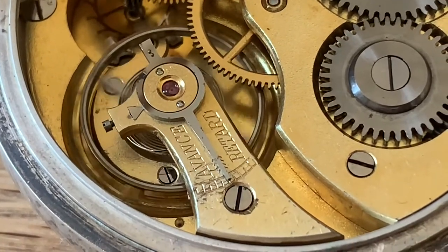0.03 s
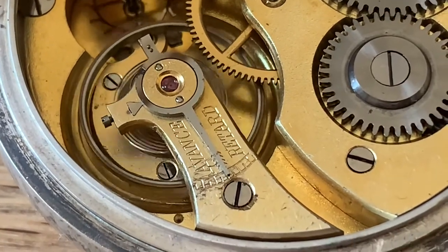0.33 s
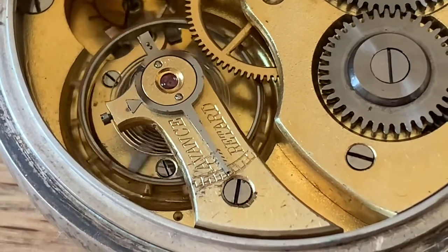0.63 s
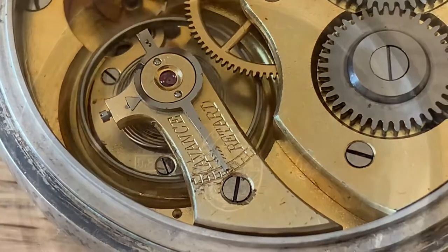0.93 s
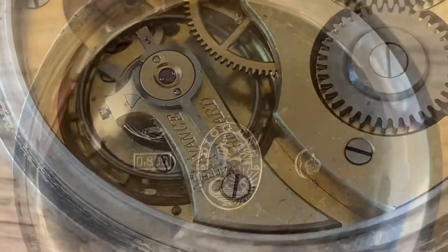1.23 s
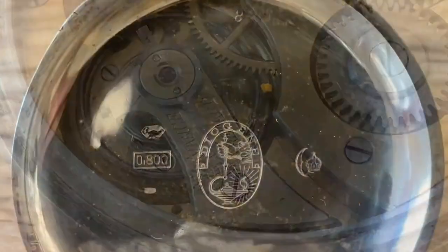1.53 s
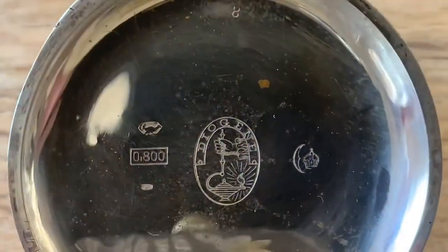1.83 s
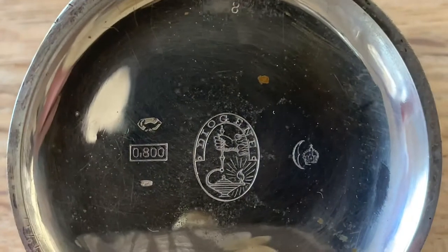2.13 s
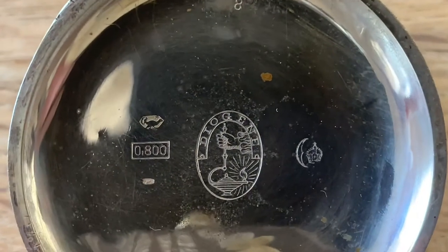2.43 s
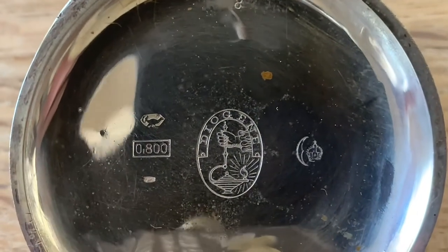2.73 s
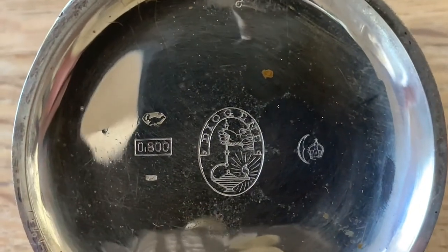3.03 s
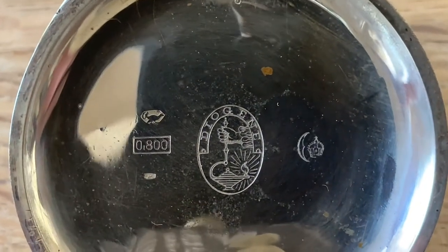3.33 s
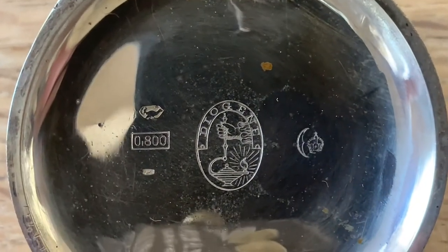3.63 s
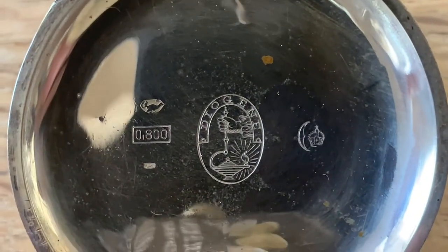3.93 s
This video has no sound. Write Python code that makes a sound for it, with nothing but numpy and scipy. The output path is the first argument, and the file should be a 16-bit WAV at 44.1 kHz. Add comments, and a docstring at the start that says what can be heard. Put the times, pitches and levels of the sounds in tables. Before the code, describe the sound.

Fast, crisp pocket watch ticking turns softer and drier, with a low rumble behind it.

```python
"""A quiet room, close to a pocket watch ticking five times a second. Each beat is three contacts
(unlocking, impulse, lock) that crack and ring the case. The bare movement dissolves into the same
watch with its inner lid shut, softer and drier. The room hums and rumbles; with the shut watch come
a low drone, like an engine far outside, and faint taps, hiss and rubbing."""
import sys
import numpy as np
from scipy.fft import rfft, irfft, next_fast_len
from scipy.io import wavfile
from scipy.ndimage import uniform_filter1d, map_coordinates

SR = 44100
rng = np.random.default_rng(int(sys.argv[2]) if len(sys.argv) > 2 else 0)


def inscribe(sig):
    """Save sig as 16-bit PCM at rate SR to the path in sys.argv[1].

    A 1-D sig is mono; a 2-D sig holds one channel per row.
    Samples are clipped to [-1, 1] before scaling.
    """
    pcm = np.round(np.clip(np.atleast_2d(sig).T, -1, 1) * 32767)
    wavfile.write(sys.argv[1], SR, pcm.astype(np.int16))


N = 176400


def amp(db):
    """Decibels to gain."""
    return 10 ** (np.asarray(db) / 20)


def unit(x):
    """Scale to rms 1."""
    return x / np.sqrt(np.mean(x ** 2) + 1e-20)


def along(points, hz):
    """Interpolate (Hz, value) points on a log axis."""
    point_hz, values = np.transpose(points)
    return np.interp(np.log(hz + 1), np.log(point_hz + 1), values)


def curve(rows):
    """Interpolate (s, value) points, one value per sample."""
    return np.interp(np.arange(N) / SR, *np.transpose(rows))


def wobble(rate_hz):
    """Smooth random curve, rate_hz knots a second."""
    knots = rng.standard_normal(int(N * rate_hz / SR) + 4)
    return map_coordinates(knots, [np.arange(N) * rate_hz / SR])


def swell(middle_s, length_s):
    """Flat-topped envelope with soft edges."""
    return np.exp(-(2 * (np.arange(N) / SR - middle_s) / length_s) ** 4)


def filtered(x, response):
    """Apply a complex frequency response."""
    size = next_fast_len(N + SR // 2)
    return irfft(rfft(x, size) * response(np.fft.rfftfreq(size, 1 / SR)), size)[..., :N]


def noise(spectrum):
    """Two independent coloured noises, rms 1."""
    return unit(filtered(rng.standard_normal((2, N)), lambda hz: amp(along(spectrum, hz))))


def narrow(hz, q):
    """Two independent noises in one resonance, rms 1."""
    white = rng.standard_normal((2, N))
    return unit(filtered(white, lambda f: 1 / (1 + (q * (f / hz - hz / (f + 1))) ** 2)))


def even(x, samples=100):
    """Level out chance swells in noise, so like blows are equally strong."""
    return x / np.sqrt(np.abs(uniform_filter1d(x ** 2, samples)) + 1e-20)


def add(track, start_s, sound):
    """Mix a sound into a track."""
    part = track[max(round(start_s * SR), 0):][:len(sound)]
    part += sound[:len(part)]


def room(spectrum, likeness, air_db, left_db, hum_db, waver_db, motor_hz=48.8):
    """Rumble and faint hiss, with the hum of a motor in the building."""
    width = lambda hz: np.arccos(np.clip(along(likeness, hz), -1, 1)) / 2
    mid, side = filtered(noise(spectrum), lambda hz: np.array([np.cos(width(hz)), np.sin(width(hz))]))
    level_db = air_db + 0.49 * wobble(6.83) + np.array([[.5], [-.5]]) * left_db
    air = unit(np.array([mid + side, mid - side])) * amp(level_db)
    hum = np.sqrt(2) * np.sin(2 * np.pi * (motor_hz * np.arange(N) / SR + rng.random()))
    return air + hum * amp(hum_db + waver_db * wobble(5))


def watch(contacts, modes, hollow_db, crack_colour, wash_colour, *, first_s, tock_lead_s, tock_db,
          contact_s, crack_db, crack_t60_s, slide_db, wash_db, wash_t60_s, echo_db, echo_t60_s):
    """Each contact cracks and rings the case; the pallet slides between them; the room answers."""
    # Each row: frequency in Hz, phase lead of left over right in radians.
    stereo_phase = [(2500, 0), (3800, -.6), (4800, -2.4), (6400, -.4), (7300, -1.6), (8100, -2.8),
                    (8750, -3.15), (10800, -6.2), (12000, -7.6), (16200, -13)]
    # Whisper before a beat and tail after it. Each row: frequency in Hz, relative density in dB.
    echo_colour = [(1900, -35), (2400, -12), (2750, 1), (3050, -1), (3300, -10), (3750, 1), (4500, -6),
                   (5400, -24), (9000, -32)]
    beat_s, swing_s, swing_db = .19828, .049, -8
    ring_db, linewidth_hz, t60_scatter, hollow_below_hz = 2.5, 20, .2, 5000
    ring, crack_power, wash_power, echo_power = np.zeros((4, N))
    t = np.arange(SR // 6) / SR
    rise = np.minimum(t / contact_s, 1)
    fall = lambda t60_s: amp(-60 * np.maximum(t - contact_s, 0) / t60_s)
    mode_hz, mode_db, mode_t60_s = np.transpose(modes)[:, :, None]
    for beat, boost_db in enumerate(hollow_db):
        tock = beat % 2
        lock_s = first_s + beat * beat_s - tock * tock_lead_s
        strength = amp(tock * tock_db + rng.normal(0, 0.18))
        # No beat rings quite like the last.
        walk = np.cumsum(rng.standard_normal((len(modes), len(t))), axis=1)
        phase = 2 * np.pi * mode_hz * t + walk * np.sqrt(2 * np.pi * linewidth_hz / SR)
        beat_t60_s = mode_t60_s * np.exp(t60_scatter * rng.standard_normal(mode_t60_s.shape))
        decay = amp(mode_db + boost_db * (mode_hz < hollow_below_hz) - 60 * t / beat_t60_s)
        partials = rise * decay * np.exp(1j * phase)
        for *ahead_s, contact_db in contacts:
            start_s = lock_s - ahead_s[tock]
            gain = strength * amp(contact_db)
            struck = amp(rng.normal(0, 1.5, len(modes))) * np.exp(2j * np.pi * rng.random(len(modes)))
            add(ring, start_s, gain * (struck[:, None] * partials).imag.sum(axis=0))
            add(crack_power, start_s, (gain * rise * fall(crack_t60_s)) ** 2)
            add(wash_power, start_s, (gain * rise * fall(wash_t60_s)) ** 2)
        add(echo_power, lock_s, (strength * rise * fall(echo_t60_s)) ** 2)
        # The balance whispers as it speeds towards the beat.
        whisper = np.linspace(0, strength * amp(swing_db), int(swing_s * SR))
        add(echo_power, lock_s - swing_s, whisper ** 2)
        slide_s = contacts[0][tock]
        slide = np.full(int(slide_s * SR), strength * amp(slide_db[tock]))
        add(crack_power, lock_s - slide_s, slide ** 2)
    crack = amp(crack_db) * np.sqrt(crack_power) * even(noise(crack_colour)[0])
    wash = amp(wash_db) * np.sqrt(wash_power) * noise(wash_colour)[0]
    spread = lambda hz: np.exp(.5j * np.outer([1, -1], along(stereo_phase, hz)))
    direct = filtered(amp(ring_db) * ring + crack + wash, spread)
    walls = noise(echo_colour)
    return direct + amp(echo_db) * np.sqrt(echo_power) * unit(walls + 0.24 * walls[::-1])


def bare_watch():
    """Exposed movement: sharp contacts, long tail."""
    # Each row: time ahead of the lock in seconds on the tick, the same on the tock, relative dB.
    contacts = [(.0100, .0090, -20), (.0055, .0054, -20), (0, 0, 0)]
    # Movement and case. Each row: frequency in Hz, relative level in dB, T60 in seconds.
    modes = [(2730, -69, .06), (3760, -64.5, .045), (4520, -71, .02), (6430, -67, .062), (7300, -64, .035),
             (7750, -63, .02), (8650, -58, .05), (10400, -50, .025), (11520, -56, .085), (11790, -59, .08),
             (12020, -61, .09), (13150, -58, .05), (13600, -45, .01), (14680, -55.5, .065),
             (15450, -65, .075)]
    # Each entry: one beat's boost of the low, hollow modes in dB.
    hollow_db = [-8, -0.5, -3.5, 3, -4, -0.5, -5, -4]
    # Steel-on-jewel crack; dense fine ringing. Each row: frequency in Hz, relative density in dB.
    crack_colour = [(2200, -71), (3600, -16.5), (5800, -26.5), (7600, -8), (9500, 0), (10600, 5.5),
                    (12000, -3), (13500, 6), (14800, 3.5), (16200, -31)]
    wash_colour = [(2000, -17.5), (7600, -14), (9000, 4), (11000, -20), (14800, 1), (16200, -29.5)]
    return watch(contacts, modes, hollow_db, crack_colour, wash_colour,
                 first_s=.1376, tock_lead_s=.0012, tock_db=1, contact_s=.00037,
                 crack_db=-34.5, crack_t60_s=.012, slide_db=(-27, -36),
                 wash_db=-64, wash_t60_s=.17, echo_db=-74, echo_t60_s=.35)


def shut_watch():
    """Inner lid shut: softer contacts, short tail."""
    # Columns as in bare_watch.
    contacts = [(.0118, .0130, -24), (.0068, .0080, -20.5), (0, 0, 0)]
    modes = [(3130, -73, .018), (3650, -68, .022), (4580, -73, .045), (6430, -83, .1), (6850, -67, .015),
             (9630, -66, .055), (10020, -72, .075), (10750, -64, .03), (11370, -72, .08),
             (11790, -70, .085), (11990, -70, .085), (13000, -55, .014), (14150, -70, .07),
             (14690, -70, .07), (15250, -70, .075)]
    hollow_db = [-4, 3, 1.5, -1.5, -3.5, -0.5, 0.5, 3, -0.5, 0, 1.5, -15, 2, 2.5, 3, 0.5, 3.5]
    crack_colour = [(2400, -48.5), (3400, -22.5), (5600, -31.5), (7600, -7.5), (9300, 6), (11000, -1),
                    (12400, 3.5), (13800, 2.5), (15200, -0.5), (16200, -26)]
    wash_colour = [(2000, -32), (5000, -2), (7500, -12.5), (9200, 7.5), (12800, -10), (15000, -15),
                   (16200, -14)]
    return watch(contacts, modes, hollow_db, crack_colour, wash_colour,
                 first_s=.8094, tock_lead_s=-.0022, tock_db=-.05, contact_s=.0015,
                 crack_db=-42.5, crack_t60_s=.014, slide_db=(-33, -32),
                 wash_db=-66.5, wash_t60_s=.091, echo_db=-79, echo_t60_s=.1)


def far_engine(left_db=1):
    """Four low orders waver and sag as the engine slows; the second swells and fades."""
    # Second order. Each row: time in seconds, frequency in Hz.
    pitch = [(1.2, 117.3), (1.8, 118.5), (2.6, 119.5), (3.0, 117.6), (3.45, 115.8), (3.75, 111), (4, 112)]
    # Second order. Each row: time in seconds, level in dB.
    levels = [(1.0, -52.5), (1.58, -50.5), (1.7, -47.5), (1.82, -47), (1.88, -65), (1.96, -45), (2.1, -46),
              (2.23, -57.5), (2.34, -44), (2.48, -47), (2.68, -50), (2.8, -53), (2.98, -41.5), (3.2, -46),
              (3.34, -50.5), (3.49, -43.5), (3.66, -54.5), (3.82, -45), (4, -47)]
    # Orders one to four. Each row: relative level in dB, waver in dB.
    orders = [(-11, 2), (0, .3), (-10, 2.5), (-17, 3)]
    shaft_phase = np.pi * np.cumsum(curve(pitch)) / SR
    level_db = curve(levels)
    drone = 0
    for order, (order_db, waver_db) in enumerate(orders, 1):
        base_db = level_db if order == 2 else level_db.mean()
        gain = amp(base_db + order_db + waver_db * wobble(11))
        drone += np.sqrt(2) * gain * np.sin(order * shaft_phase + 2 * np.pi * rng.random())
    return drone * amp(np.array([[.5], [-.5]]) * left_db)


def taps(t60_s=.06, q=4):
    """Tiny dull taps: decaying bursts of resonant noise."""
    # Each row: start in seconds, centre in Hz, level in dB.
    hits = [(1.292, 2030, -72), (1.895, 1650, -70), (2.077, 2450, -76)]
    t = np.arange(N) / SR
    return sum((t > start_s) * amp(db - 60 * np.abs(t - start_s) / t60_s) * narrow(hz, q)
               for start_s, hz, db in hits)


def thin_hiss(level_db=-84):
    """One faint swell of high noise."""
    # Each row: frequency in Hz, relative density in dB.
    colour = [(5000, -13), (7300, 2), (8600, -16), (11000, 0), (13200, -20), (15200, -4), (16200, -24)]
    return amp(level_db) * swell(middle_s=1.77, length_s=.76) * noise(colour)


def rubbing(grain_db=3.5, grain_hz=43.95, q=2.76):
    """Soft rubbing: grainy swells of midrange noise."""
    # Each row: middle in seconds, length in seconds, centre in Hz, level in dB.
    strokes = [(1.896, 0.64, 944, -75.5), (2.29, 0.8, 606, -74), (2.942, 0.11, 1010, -74.5)]
    rubs = sum(amp(db) * swell(middle_s, length_s) * narrow(hz, q)
               for middle_s, length_s, hz, db in strokes)
    return rubs * amp(grain_db * wobble(grain_hz))


def scene(dissolve_start_s=.77, dissolve_end_s=1.76):
    """The bare movement dissolves into the shut watch, each with its room tone."""
    # Room noise. Each row: frequency in Hz, relative density in dB.
    bare_air = [(20, -29), (35, -13.5), (68, 8), (95, -0.5), (260, -8.5), (400, -12), (600, -22.5),
                (1100, -38), (2200, -43), (7000, -51), (11000, -49.5), (16000, -67)]
    shut_air = [(20, -34), (38, -19), (60, 0.5), (85, 0), (130, -1.5), (220, 0.5), (300, -4), (430, -13),
                (650, -23), (1300, -36), (2400, -41), (7000, -47), (11000, -51), (16000, -59.5)]
    # Each row: frequency in Hz, left-right correlation of the room noise.
    bare_likeness = [(60, -0.44), (130, 0.33), (5000, -0.15), (8600, -.85), (10800, 0.93), (13300, -0.86),
                     (15500, 0.93)]
    shut_likeness = [(55, 0.79), (130, 0.61), (290, 0.83), (640, 0.21), (8600, -0.6), (10800, 1),
                     (13300, -1), (15500, 1)]
    # The rumble swells as the engine comes by. Each row: time in seconds, level in dB.
    rumble = [(1.2, -56), (1.8, -55), (2.45, -54), (4, -55.5)]
    bare = bare_watch()
    bare += room(bare_air, bare_likeness, air_db=-52.5, left_db=3, hum_db=-56.5, waver_db=3.5)
    shut = shut_watch()
    shut += room(shut_air, shut_likeness, air_db=curve(rumble), left_db=.96, hum_db=-52.5, waver_db=3)
    shut += far_engine() + taps() + thin_hiss() + rubbing()
    share = curve([(dissolve_start_s, 0), (dissolve_end_s, 1)])
    return (1 - share) * bare + share * shut


def record(dry, fade_s=.006, top_hz=16500):
    """Fade both ends and limit the band."""
    edge_s = np.minimum(np.arange(N), np.arange(N)[::-1]) / SR
    fade = np.sin(np.pi / 2 * np.minimum(edge_s / fade_s, 1)) ** 2
    return filtered(dry * fade, lambda hz: hz < top_hz)


dry = scene()
out = record(dry)
inscribe(out)
```